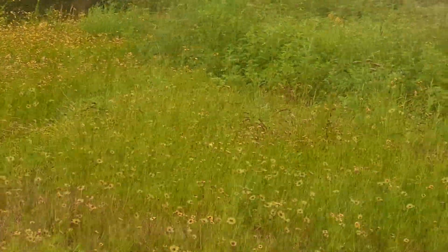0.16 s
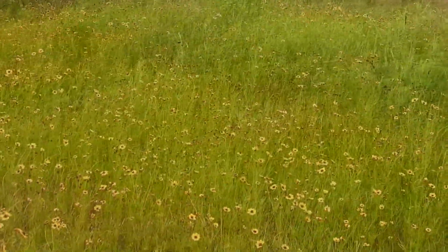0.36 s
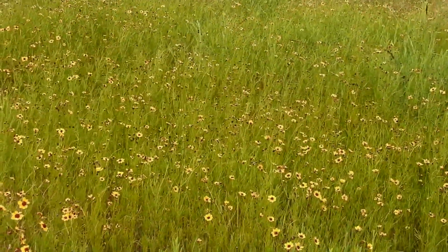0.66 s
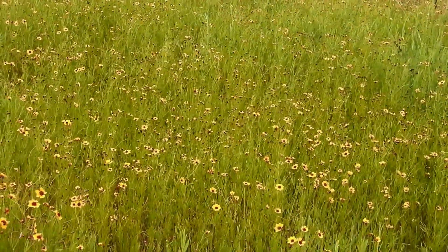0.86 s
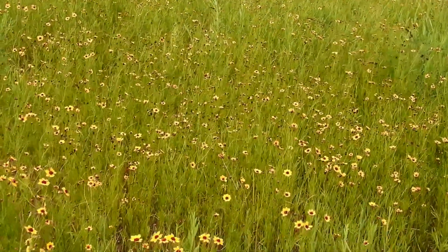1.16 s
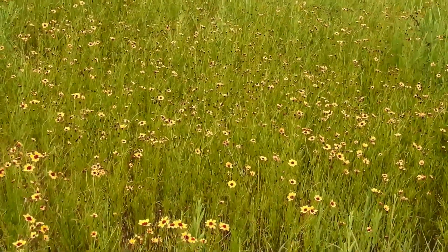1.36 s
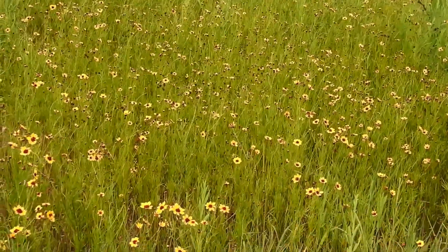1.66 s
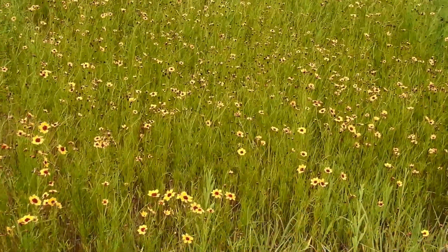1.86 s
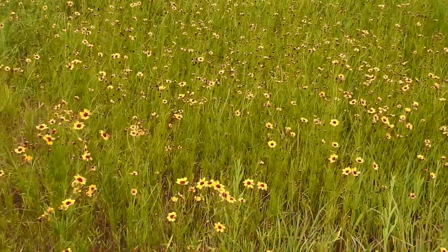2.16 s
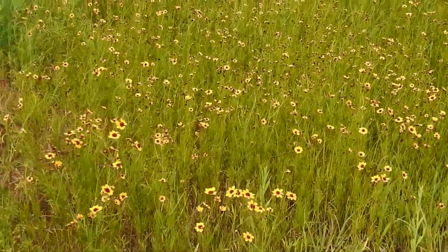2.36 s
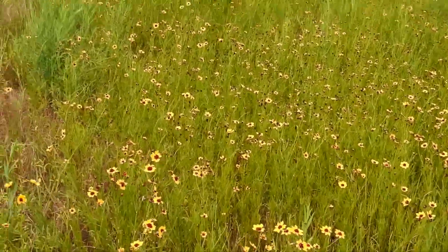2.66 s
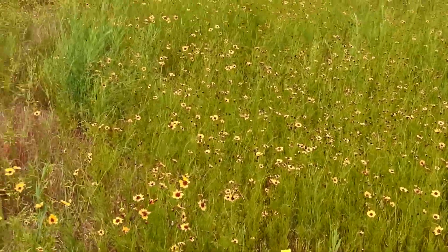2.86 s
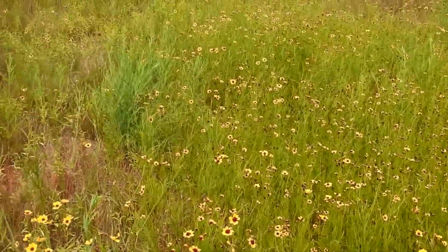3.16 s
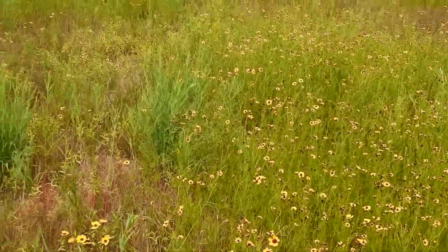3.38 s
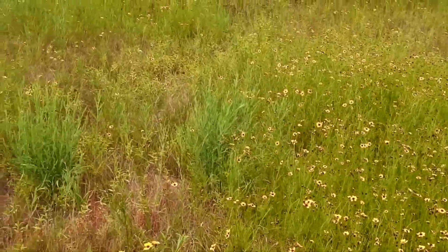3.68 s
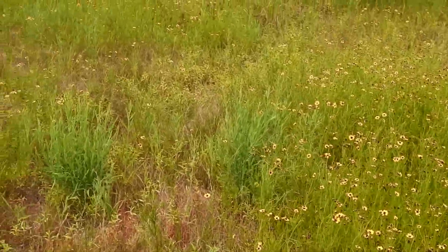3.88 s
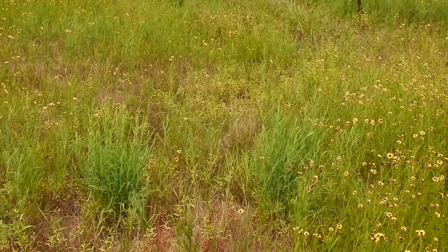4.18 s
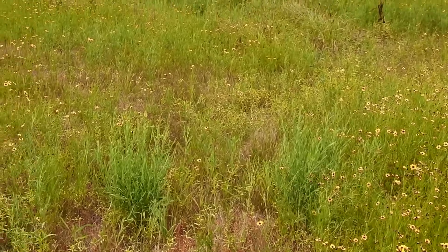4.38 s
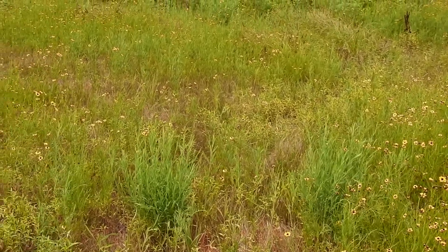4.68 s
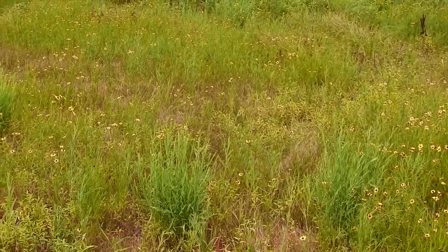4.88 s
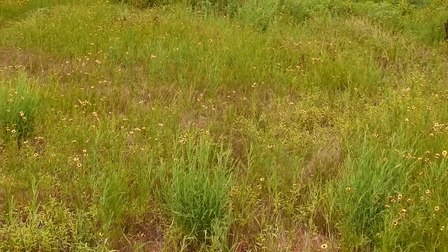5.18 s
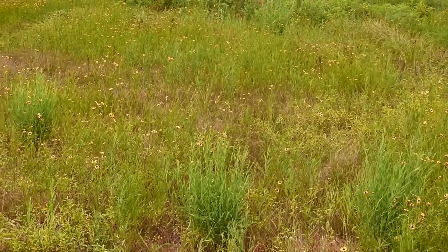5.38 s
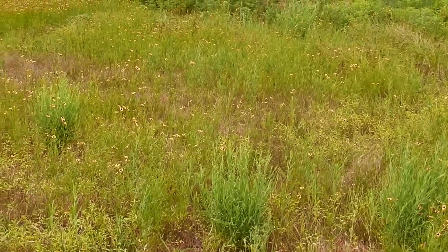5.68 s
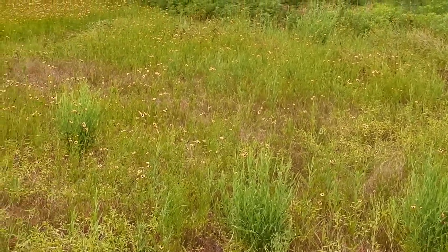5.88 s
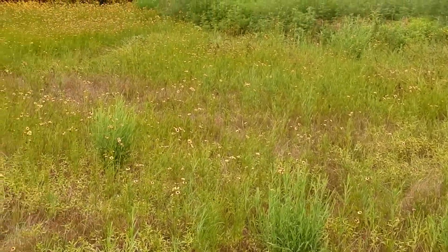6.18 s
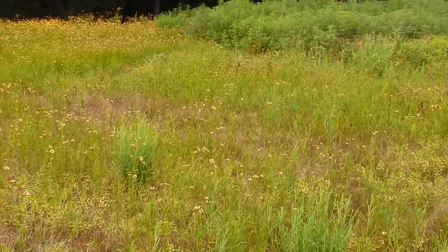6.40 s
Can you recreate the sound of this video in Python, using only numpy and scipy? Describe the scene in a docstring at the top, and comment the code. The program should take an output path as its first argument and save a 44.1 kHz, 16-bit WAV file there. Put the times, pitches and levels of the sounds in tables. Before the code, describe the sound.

A rough gust thumps and fades to steady high insect drone and busy birdsong, with faint bee hums and renewed wind rumble at the end.

```python
"""A gust buffets a hand-held pair of microphone ports, over a far wash of grass and air; gusts return at the end.
A cricket chorus drones under one near triller and the rasps of two katydids; wing hums rise and fade later.
Birds sing clear whistles, burry slurs and quick chips. Wind, wash and wings are shaped noise, with a
gliding tone in the near trill; birdsong and wing hums are near-sine tones."""
import sys
import numpy as np
from scipy import signal
from scipy.fft import rfft, irfft
from scipy.io import wavfile
from scipy.ndimage import uniform_filter1d

SR = 44100
rng = np.random.default_rng(int(sys.argv[2]) if len(sys.argv) > 2 else 0)


def to_wav(sig):
    """Store sig (one row per channel, or 1-D mono) as 16-bit WAV at the path in sys.argv[1].

    Samples outside -1..1 are clipped; the rate is SR.
    """
    pcm = np.clip(np.atleast_2d(sig), -1, 1) * 32767
    pcm = np.round(pcm).astype(np.int16)
    wavfile.write(sys.argv[1], SR, pcm.T)  # frames by channels


N = 288502

# one table a gust: (time [s], force at left port [dB], force at right port [dB])
GUSTS = [
    [(0.0, -5.5, -8.5), (0.017, -13.5, -15), (0.03, -10, -15), (0.08, -10, -11), (0.097, -16.5, -11.5),
     (0.122, -12.5, -14.5), (0.162, -12, -13), (0.172, -20.5, -15), (0.19, -12, -12), (0.215, -22, -27),
     (0.224, -23, -23), (0.252, -13, -16), (0.267, -23, -19), (0.282, -19, -17.5), (0.304, -15.5, -19),
     (0.357, -20, -20.5), (0.367, -21.5, -20), (0.496, -24.5, -27.5), (0.516, -42, -39.5),
     (0.551, -36, -38), (0.566, -56, -61), (0.591, -42.5, -40.5), (0.639, -57, -59), (0.718, -53, -55)],
    [(5.2, -49.5, -52), (5.302, -47.5, -59), (5.322, -38.5, -34.5), (5.34, -37.5, -48), (5.39, -47, -49),
     (5.407, -39, -41.5), (5.452, -51, -48.0), (5.482, -33.5, -47), (5.532, -47, -50), (5.589, -28.5, -35),
     (5.632, -52, -48.5), (5.664, -40, -42), (5.696, -37, -38), (5.714, -46, -44), (5.786, -40.5, -34),
     (5.839, -41, -43), (5.898, -22, -24), (5.951, -24.5, -27), (5.971, -37, -31), (5.986, -24.5, -22.5),
     (6.003, -31.5, -30.0), (6.046, -15, -14), (6.063, -23, -26.0), (6.078, -15, -18.5),
     (6.143, -19.5, -17), (6.155, -19, -22), (6.165, -20, -21), (6.198, -25, -22), (6.215, -26, -22),
     (6.23, -21, -23.5), (6.245, -23, -29), (6.263, -21, -17.5), (6.29, -30, -30.5), (6.322, -20, -17.5),
     (6.382, -26, -26), (6.41, -23, -21), (6.432, -30, -29.5), (6.452, -15.5, -17), (6.48, -26, -28),
     (6.495, -20, -19), (6.522, -21.0, -15), (6.539, -14.5, -14)],
]
# tone of each gust: (harshness at a force of 0 dB [dB], strength of the recorder's block ticks during it [dB])
GUST_TONES = [(-12.5, 13), (-22.5, 8)]
# body of the buffet, its last level held above: (frequency [Hz], relative level [dB])
BUFFET = [(25, -45), (70, -16), (105, -9), (135, -0.5), (200, 2.5), (250, -2.5)]
# sharp eddies that slap one port: (time [s], pitch [Hz], level [dB], port [0 left, 1 right])
EDDIES = [(0.022, 1030, -15, 0), (0.039, 660, -36, 1), (0.06, 920, -16, 0), (0.06, 850, -15, 1),
          (0.075, 780, -17.5, 1), (0.085, 1190, -25.5, 0), (0.104, 435, -10, 1), (0.103, 510, -24, 0),
          (0.126, 397, -29, 0), (0.129, 425, -18, 1), (0.158, 740, -22, 1), (0.173, 1270, -25, 0),
          (0.25, 463, -24, 0), (0.251, 422, -14, 1), (0.269, 845, -18, 1), (0.133, 1050, -35, 1),
          (0.311, 710, -27, 0), (0.212, 1190, -31, 0), (0.303, 1280, -20.5, 0), (0.332, 437, -18, 1),
          (0.337, 1300, -27, 0), (0.402, 760, -28.5, 0), (5.898, 560, -29, 1), (6.012, 435, -25, 0),
          (6.04, 450, -21, 1), (6.108, 576, -24, 1), (6.164, 536, -24, 0), (0.063, 500, -19, 0),
          (0.084, 450, -16, 0), (0.225, 234, -12, 1), (5.88, 610, -36, 0), (6.045, 202, -15, 1),
          (6.049, 207, -10, 0), (6.144, 199, -14, 0), (6.229, 194, -13, 0), (6.23, 198, -15, 1),
          (6.409, 200, -16, 0), (6.408, 210, -18.5, 1), (6.455, 203, -12, 1), (6.492, 191, -16.5, 1),
          (6.497, 177, -12, 0), (6.163, 1050, -39, 0), (6.02, 754, -32.5, 1), (6.27, 710, -31.5, 1),
          (6.187, 664, -31, 0), (6.323, 460, -21, 1), (6.323, 397, -22.5, 0), (6.453, 382, -19, 0),
          (6.507, 580, -20, 1), (6.528, 925, -21, 1)]
# colour of the far wash: (frequency [Hz], relative level [dB])
WASH = [(20, -52), (60, 6), (140, -5.5), (320, -8.5), (800, -15.5), (1900, -18.5), (2800, -13.5),
        (5000, -11.5), (6900, -9.5), (7600, -22), (8300, -25), (10200, -22), (10800, -87), (12500, -40),
        (15500, -42.5)]
# swell of the wash's low and middle range: (time [s], level [dB])
SWELL = [(0.6, -1), (0.9, -3.5), (1.5, -1.5), (1.66, 1), (1.93, 1), (2.12, -2.5), (3.4, -1.5), (4.0, -0.5),
         (4.37, 2.5), (4.7, 0), (5.13, 3), (5.3, 0)]
# swell of the deepest bass: (time [s], level [dB])
RUMBLE = [(0.69, -10), (0.83, -3), (0.95, -4), (1.5, 4.5), (1.71, -20), (2.05, -17), (2.12, -1.5), (3.0, 2),
          (4.0, -3), (4.37, 6), (4.74, 2), (5.06, -16), (5.13, -1)]
# how the wash reaches the ports: (frequency [Hz], likeness [0-1], left port's lead [rad], left minus right [dB])
WASH_PORTS = [(59.7, 0.86, 0.5, 0.5), (700, 0.96, -0.46, 0), (1820, 0.92, -0.7, 2), (3040, 0.74, 1, 3.5),
              (3320, 0.99, .5, 4.5), (4830, 0.5, 1.34, -1), (5230, 1, 1.5, 7), (6900, 0.6, -9.5, 3),
              (7390, 0.76, 3.5, 2), (11000, 1, 4, -1), (13000, .05, -36.5, 0)]
# cricket levels: (time [s], near triller [dB], far chorus [dB])
CRICKETS = [(0.0, -63, -39), (0.3, -39, -39), (0.65, -39, -35), (2.0, -39.5, -35.5), (2.5, -36.5, -36),
            (3.3, -35, -37), (4.0, -39, -39), (4.5, -39, -38.5), (5.2, -40, -39.5), (5.9, -50, -38.5),
            (6.54, -44.5, -40)]
# wing resonances of the far chorus: (frequency [Hz], width [Hz], relative level [dB])
WINGS = [(6065, 386, 8), (6280, 138, 4), (6460, 200, -12)]
# middle of each katydid rasp: (time [s])
KATYDID = [0.16, 0.35, 0.53, 0.74, 0.92, 1.11, 1.31, 1.51, 1.73, 1.93, 2.12, 2.28, 2.48, 2.64, 3.04, 3.27,
           3.48, 3.66, 3.87, 4.06, 4.31, 4.49, 4.69, 4.87, 5.05, 5.2, 5.37, 5.56, 5.77, 5.98, 6.19, 6.37,
           6.53]
# first katydid: (time [s], level [dB], left port's lead [rad])
KATYDID_LEVEL = [(0.16, -55, -2), (.4, -52, -2), (.9, -49, -2.5), (2.1, -52, -2), (3.0, -53, -3),
                 (3.8, -54, -3), (4.5, -53.5, -3.5), (5.1, -52, -2.5), (5.6, -51, -2.5), (6.0, -49.5, -4),
                 (6.54, -48, -3.5)]
# middle of each rasp of a second, higher katydid: (time [s])
NEIGHBOUR = [.44, .68, .96, 1.15, 1.36, 1.55, 1.71, 1.87, 2.08, 2.26, 2.45, 2.66, 2.862, 3.08, 3.295, 3.52,
             3.75, 3.985, 4.194, 4.402, 4.66, 4.9, 5.1, 5.33, 5.535, 5.73, 5.96, 6.33]
# second katydid: (time [s], level [dB], left port's lead [rad])
NEIGHBOUR_LEVEL = [(.4, -61, -9), (2.5, -56.5, -2), (3.0, -57.5, -9), (4.4, -54.5, -3.5), (5.5, -62, -3),
                   (6.4, -58, -2.5)]
# plain notes of the whistler: (start [s], length [s], from pitch [Hz], to pitch [Hz], level [dB])
WHISTLES = [(3.405, 0.039, 5600, 5700, -35), (3.61, 0.09, 4060, 4080, -43), (4.775, 0.035, 5960, 5720, -29),
            (4.866, 0.029, 4760, 3580, -37.5), (4.99, 0.025, 4590, 4550, -36),
            (5.012, 0.023, 4580, 4170, -37.5), (4.825, 0.027, 6150, 7100, -42),
            (5.71, .03, 5300, 4350, -41.5), (5.74, .018, 4400, 4370, -43), (5.855, .015, 5700, 5150, -41),
            (5.935, .03, 4200, 4130, -45), (5.965, 0.037, 5630, 4230, -39.5),
            (6.055, .015, 3210, 3900, -42), (6.128, 0.021, 4770, 5130, -39), (6.135, 0.13, 7900, 8300, -51),
            (6.218, 0.023, 5660, 4130, -41.5), (6.245, 0.045, 4100, 2870, -48),
            (5.71, 0.039, 5770, 5720, -34), (6.392, 0.021, 7700, 7620, -51)]
# burry notes of the farther singer: (start [s], length [s], from pitch [Hz], to pitch [Hz], level [dB])
SLURS = [(.5, 0.08, 3620, 3300, -51), (.85, 0.068, 3800, 3120, -48.5), (2.52, 0.054, 3780, 2600, -51),
         (2.68, 0.094, 2510, 2380, -52), (2.83, 0.066, 3700, 3110, -46), (3.08, 0.035, 3880, 3850, -42),
         (3.268, 0.079, 4110, 3450, -43.5), (3.45, 0.061, 3840, 3630, -45), (3.515, 0.044, 3580, 3200, -51),
         (3.775, 0.093, 3960, 3620, -45.5), (3.885, 0.063, 3600, 3050, -42), (4.1, 0.14, 3450, 3040, -46.5),
         (4.165, 0.034, 4200, 4230, -48), (4.185, 0.066, 2645, 2500, -49.5), (4.7, 0.08, 3870, 3500, -41.5),
         (4.755, 0.056, 2470, 2470, -51.5), (4.91, 0.035, 3450, 3320, -53), (4.97, 0.036, 2990, 2610, -58),
         (5.722, 0.081, 3600, 3740, -44.5), (5.785, 0.115, 3780, 2800, -43)]
# quick notes of the farther singer: (start [s], length [s], from pitch [Hz], to pitch [Hz], level [dB])
CHIPS = [(.353, 0.01, 2640, 2480, -45), (.373, 0.02, 2520, 2740, -52), (.418, 0.019, 2410, 2140, -59),
         (.438, 0.0092, 3320, 2880, -44), (.468, 0.0096, 2970, 2610, -45), (.953, 0.018, 3250, 2570, -46),
         (.99, 0.02, 3020, 2750, -54), (1.49, .018, 3570, 2950, -58), (1.636, .02, 4080, 3080, -47),
         (1.795, 0.013, 3720, 3300, -49), (1.816, 0.035, 3250, 2400, -48), (1.865, .035, 2620, 2150, -50),
         (1.924, 0.015, 3720, 3200, -49), (2.705, 0.017, 3860, 3150, -48), (2.953, 0.019, 3400, 2900, -47),
         (2.986, 0.026, 3800, 3050, -43.5), (3.021, .021, 3400, 2750, -47.5),
         (3.125, 0.018, 3770, 3470, -52), (3.14, 0.027, 3460, 2650, -45.5), (3.167, 0.02, 2630, 2320, -52),
         (3.345, 0.027, 3300, 2320, -52), (3.385, 0.019, 2930, 2300, -44.5),
         (3.403, 0.018, 2470, 2650, -52), (3.578, 0.013, 2900, 2350, -48), (3.6, .025, 2820, 2200, -47),
         (3.685, .018, 2990, 2320, -52), (3.705, .02, 1920, 1650, -60), (3.72, 0.017, 2600, 2400, -57),
         (4.3, 0.014, 2750, 2670, -46.5), (4.385, 0.02, 2830, 2360, -44.5), (4.7, 0.014, 3330, 3130, -47),
         (4.745, 0.018, 3220, 2910, -46), (4.84, 0.014, 2350, 2660, -45.5), (4.893, 0.013, 2470, 2400, -50),
         (5.095, 0.012, 2160, 2080, -53), (5.215, 0.015, 1820, 2100, -59), (5.245, 0.014, 2140, 1850, -53),
         (5.245, 0.026, 3900, 2330, -47), (5.277, 0.011, 2520, 1800, -60), (5.29, 0.023, 2810, 1840, -49),
         (5.313, 0.02, 3110, 2150, -49), (5.592, 0.022, 3300, 2130, -49), (5.617, 0.017, 3300, 2550, -48),
         (5.637, 0.016, 2520, 2480, -45), (5.652, 0.02, 2230, 1710, -50), (5.66, 0.024, 4350, 3250, -48),
         (5.675, 0.017, 2700, 2370, -49), (5.702, 0.019, 3670, 2780, -48), (5.79, .02, 1800, 2130, -51),
         (5.93, 0.023, 2470, 2670, -46), (5.938, 0.03, 4400, 3010, -45), (5.97, 0.028, 2670, 2260, -47.5),
         (6.0, .015, 2150, 1830, -50.5), (6.155, 0.025, 4070, 4270, -49), (6.31, 0.049, 3200, 1820, -55),
         (6.34, 0.012, 3460, 3000, -45)]
# the whistler's arching call: (time after start [s], pitch [Hz], level against the call's [dB])
ARCH = [(0, 4426, -5), (.007, 4804, 1.5), (.035, 5170, 1), (.057, 6080, 4), (.077, 6240, -2.5),
        (.094, 5720, -2.5), (.11, 4450, 3.5), (.122, 4020, -3), (.13, 3850, -8), (.157, 3420, -5),
        (.179, 3220, -9.5)]
# the whistler's spiking call: (time after start [s], pitch [Hz], level against the call's [dB])
SPIKE = [(0, 3420, -8.5), (.028, 4030, -4.5), (.034, 5630, 5), (.038, 6850, -15), (.044, 5980, -6),
         (.056, 4650, 2.5), (.068, 3540, -17)]
# the whistler's hooking call: (time after start [s], pitch [Hz], level against the call's [dB])
HOOK = [(0, 4140, -1), (.023, 3660, -14), (.04, 4230, 1), (.06, 4720, 3.5), (.07, 4530, -6)]
# the whistler's capped call: (time after start [s], pitch [Hz], level against the call's [dB])
CAP = [(0, 6700, -14), (.012, 7300, 1), (.025, 7310, 0), (.05, 6960, -10)]
# when each arch is sung: (start [s], level [dB])
ARCHES = [(3.844, -32.5), (4.143, -30), (6.427, -35)]
# when each spike is sung: (start [s], level [dB])
SPIKES = [(4.423, -36.5), (4.597, -30)]
# when each hook is sung: (start [s], level [dB])
HOOKS = [(5.316, -40), (5.498, -40)]
# when each cap is sung: (start [s], level [dB])
CAPS = [(3.787, -42), (4.089, -35)]
# the whistler is off to the right, and the ports turn: (time [s], delay at the left port [microseconds])
WHISTLER_LAG = [(3.4, 70), (4.1, 49), (5.5, 64), (5.98, 56), (6.1, 47), (6.5, 36)]
# one table a bee: (time [s], wing beat [Hz], level [dB], overtone against it [dB])
BEES = [
    [(4.15, 272.5, -59, -8), (4.35, 272, -51.5, 1), (4.6, 267.7, -52.5, -3), (4.85, 273.5, -61.5, -5)],
    [(4.2, 339.6, -72, -3), (4.4, 343, -56.5, 1.5), (4.65, 324.4, -52, -12), (5.0, 331, -52.5, -15),
     (5.4, 323, -63, -20)],
]

HARSHER = 0.23  # dB of harshness per dB of force
STEADIED = .35  # share of the buffet's own flutter that is evened out
SEAM_SPACING_S, FIRST_SEAM_S = .01066, .0038  # steady ticks at the recorder's block seams, timed from zero
WASH_DB, RUMBLE_FLICKER_DB = -51, 1.5
STROKES_PER_S, FIRST_STROKE_S = 56.31, .0015  # wing strokes of the near cricket
RASP_S = 0.074  # length of a katydid rasp
SLUR_BURR = .85  # depth of the burr, 0-1
SWELLING_DB = 5  # a plain note is this much softer at its ends
# share of the glide beyond half still owed at mid-note: positive moves late, negative early
WHISTLE_BOW, SLUR_BOW, CHIP_BOW = 0.0965, 0.119, -.1
EDGE_HZ = 15650  # upper band limit


def gain_of(db):
    """Amplitude factor for a level in dB."""
    return 10 ** (np.asarray(db) / 20)


def evened(x):
    """Scales a signal to an RMS of one."""
    return x / np.sqrt(np.mean(abs(x) ** 2) + 1e-20)


def read(points, hz):
    """Columns of a table on a log-frequency axis."""
    f, *columns = np.transpose(points)
    return [np.interp(np.log(hz + 1), np.log(f + 1), c)[:, None] for c in columns]


def follow(rows, t):
    """Columns of a curve at the times t."""
    s, *columns = np.transpose(rows)
    return [np.interp(t, s, c) for c in columns]


def add(mix, s, sound):
    """Lays a sound into the mix from s seconds, cut at the end."""
    part = mix[..., max(round(s * SR), 0):][..., :sound.shape[-1]]
    part += sound[..., :part.shape[-1]]


def resonate(x, hz, width):
    """A steep resonance: shift hz to zero, smooth twice, shift back."""
    turn = np.exp(2j * np.pi * hz * np.arange(x.shape[-1]) / SR)
    r = np.exp(-np.pi * width / SR)
    once = signal.lfilter([1 - r], [1, -r], x / turn)
    twice = signal.lfilter([1 - r], [1, -r], once)
    return twice * turn


def ports(z, lead, pan_db):
    """Places an analytic signal between the ports by the left port's phase lead and level excess."""
    side = np.array([[.5], [-.5]])
    return (z * np.exp(1j * lead * side) * gain_of(pan_db * side)).real


def scatter(x, t60, wet_db):
    """Grass and bushes throw back a short diffuse tail, decaying 60 dB in t60 seconds, other for each port."""
    t = np.arange(round(.3 * SR)) / SR
    tail = rng.standard_normal((2, len(t))) * gain_of(-60 * t / t60) * (t > .004)
    tail = tail / np.linalg.norm(tail[0])
    return x + gain_of(wet_db) * signal.fftconvolve(x, tail, axes=1)[:, :N]


def buffet(force_db, harsh_db, length):
    """Turbulence at each port: deep noise whose upper part spits up and down from moment to moment."""
    hz, frames = np.fft.rfftfreq(512, 1 / SR), force_db.shape[1]
    harsh_db = harsh_db + HARSHER * force_db[:, None]
    spits = evened(uniform_filter1d(rng.standard_normal((frames, 2)), size=3, axis=0)).T[:, None]
    reach = np.log(np.maximum(hz, 250) / 250)[:, None] / np.log(4)  # 0 up to 250 Hz, 1 at 1 kHz
    upper_db = reach * (harsh_db + 4.5 * spits) - 8.1 * reach ** 2
    a, b = rng.standard_normal((frames, 257, 2, 2)).T
    x = signal.istft((a + 1j * b) * gain_of(upper_db), nperseg=512, noverlap=448)[1][:, :length]
    body = gain_of(read(BUFFET, np.arange(SR + 1) / 2)[0].T)
    x = evened(irfft(rfft(x, SR * 2) * body)[:, :length])
    power = uniform_filter1d(uniform_filter1d(x ** 2, size=400, axis=1), size=400, axis=1)
    flutter = abs(power) + .01
    return evened(x / flutter ** (STEADIED / 2))


def wind():
    """Each gust shakes both ports independently; the recorder, working in blocks, ticks at each seam with its force."""
    out = np.zeros((2, N))
    for rows, (harsh_db, tick_db) in zip(GUSTS, GUST_TONES):
        t = np.arange(rows[0][0], rows[-1][0], 1 / SR)
        frame_t = t[0] + np.arange(len(t) // 64 + 9) * 64 / SR
        x = buffet(np.array(follow(rows, frame_t)), harsh_db, len(t))
        seams = np.diff(np.floor((t - FIRST_SEAM_S) / SEAM_SPACING_S), prepend=np.inf) > 0
        ticks = rng.standard_normal((len(t), 2)).T * seams
        x = x + gain_of(tick_db) * uniform_filter1d(ticks, size=10, axis=1)
        add(out, t[0], gain_of(follow(rows, t)) * x)
    return out


def eddies():
    """Each slap is resonant noise under a bell-shaped fade, a rough burst of about ten milliseconds."""
    out, t = np.zeros((2, N)), np.arange(-.02, .02, 1 / SR)
    for s, hz, db, port in EDDIES:
        burst = evened(resonate(rng.standard_normal(len(t)), hz, 0.26 * hz).real)
        add(out[int(port > .5)], s - .02, gain_of(db) * burst * np.exp(-(t / 0.0049) ** 2))
    return out


def wash():
    """Far grass, air and insects: random short-time spectra with drifting patches."""
    frames, hz = N // 256 + 5, np.fft.rfftfreq(1024, 1 / SR)
    a, b, c, d, patches = rng.standard_normal((frames, 513, 5)).T
    patches = evened(uniform_filter1d(uniform_filter1d(patches, size=10, axis=0), size=12, axis=1))
    t = np.arange(frames) * 256 / SR
    flicker = evened(uniform_filter1d(rng.standard_normal(frames), size=14))
    swell_db = follow(SWELL, t)[0]
    rumble_db = follow(RUMBLE, t)[0] + RUMBLE_FLICKER_DB * flicker
    same, lead, pan_db = read(WASH_PORTS, hz)
    same = np.clip(same, 0, 1)
    left = a + 1j * b
    right = same * np.exp(-1j * lead) * left + np.sqrt(1 - same ** 2) * (c + 1j * d)
    low = np.exp(-(hz / 130) ** 2)[:, None]
    mid = np.exp(-(hz / 2300) ** 4)[:, None]
    # the swell moves the low and middle range; the insect hiss above does not follow it
    field_db = read(WASH, hz)[0] + mid * swell_db + low * rumble_db + 1.88 * patches
    both = np.array([left * gain_of(pan_db / 2), right / gain_of(pan_db / 2)])
    return signal.istft(both * gain_of(field_db + WASH_DB), nperseg=1024, noverlap=768)[1][:, :N]


def far_crickets():
    """A blurred chorus: noise, partly shared by the ports, rings in a few wing resonances."""
    chorus = np.zeros((2, N))
    for hz, width, db in WINGS:
        shared, *own = rng.standard_normal((3, N))
        together = ports(evened(resonate(shared, hz, width)), -2.38, .8)
        apart = evened(resonate(np.array(own), hz, width)).real
        chorus += gain_of(db) * (0.65 * together + 0.75 * apart)
    return evened(chorus)


def near_cricket(t):
    """One near cricket scrapes in steady strokes, a sagging tone roughened by resonant noise."""
    unsteady = evened(uniform_filter1d(rng.standard_normal(N), size=900))
    stroke = (STROKES_PER_S * (t - FIRST_STROKE_S) + 0.0056 * unsteady + .5) % 1 - .5
    closing = np.exp(-(stroke / 0.26) ** 2)  # the wing sounds mainly while it closes
    hz = 6290 + 40 * unsteady - 1300 * stroke * closing  # pitch falls through each stroke, from above 6290 Hz to below it
    glide = np.exp(2j * np.pi * np.cumsum(hz) / SR)
    rasp = evened(resonate(rng.standard_normal(N), 6150, 700))
    return scatter(ports(evened(closing * (glide + .35 * rasp)), -.6, .5), .06, -9)


def crickets():
    """The far chorus and the near triller, each following its own level curve."""
    t = np.arange(N) / SR
    near_db, far_db = follow(CRICKETS, t)
    return gain_of(far_db) * far_crickets() + gain_of(near_db) * near_cricket(t)


def katydid():
    """Each rasp is a flat burst of fast tooth strikes ringing a high wing; a higher neighbour keeps its own time."""
    t, out = np.arange(N) / SR, np.zeros((2, N))
    strikes = rng.choice([-30, 30], (2, N)) * (np.diff(np.floor(132 * t), prepend=0) > 0)  # 132 a second
    teeth = strikes + .8 * rng.standard_normal((2, N))  # strikes and scrape
    singers = ((teeth[0], KATYDID, KATYDID_LEVEL, 8830), (teeth[1], NEIGHBOUR, NEIGHBOUR_LEVEL, 9250))
    for drive, times, level, hz in singers:
        bursts = np.zeros(N)
        for s in times:
            add(bursts, s - RASP_S / 2, signal.windows.tukey(round(RASP_S * SR), .4))
        db, lead = follow(level, t)
        out += ports(gain_of(db) * bursts * evened(resonate(drive, hz, 600)), lead, -1.2)
    return scatter(out, 0.042, -5.0)


def calls(shape, rows):
    """One fixed shape of pitch and level, sung at each start."""
    return [np.add(shape, (s, 0, db)) for s, db in rows]


def glides(rows, bow):
    """A plain note slides from one pitch to the other along a bowed line, loudest in its middle."""
    notes = []
    for s, length, a, b, db in rows:
        middle = (s + length / 2, (a + b) / 2 + bow * (a - b), db)
        notes.append([(s, a, db - SWELLING_DB), middle, (s + length, b, db - SWELLING_DB)])
    return notes


def song(notes, burr, edge_s, lag=((0, 0),)):
    """Near-sine notes, one row a port; a burr pulses the tone and swings its pitch about 140 times a second."""
    out = np.zeros((2, N), complex)
    for rows in notes:
        t = np.arange(rows[0][0] - edge_s, rows[-1][0] + edge_s, 1 / SR)
        hz, db = follow(rows, t)
        unsteady = evened(uniform_filter1d(rng.standard_normal(len(t)), size=150))
        beat = 2 * np.pi * (140 * t + rng.random()) + 0.23 * unsteady
        hz = uniform_filter1d(hz, size=130) * (1 + burr * (.033 * np.sin(beat) + .012 * unsteady))
        fade = signal.windows.tukey(len(t), min(4 * edge_s / (t[-1] - t[0]), 1))
        delay_turns = hz * follow(lag, t)[0] * np.array([[-.5e-6], [.5e-6]])  # split between the ports
        tone = np.exp(2j * np.pi * (np.cumsum(hz) / SR + delay_turns))
        add(out, t[0], np.sqrt(2) * gain_of(db) * fade * tone * (1 + burr * np.cos(beat)))
    return out


def birds():
    """Gliding tones: the whistler sits to the right, the other singer farther off to the left."""
    clear = calls(ARCH, ARCHES) + calls(SPIKE, SPIKES) + calls(HOOK, HOOKS) + calls(CAP, CAPS)
    clear += glides(WHISTLES, WHISTLE_BOW)
    whistler = ports(song(clear, burr=0.082, edge_s=.003, lag=WHISTLER_LAG), 0, 0.74)
    slurs = ports(song(glides(SLURS, SLUR_BOW), burr=SLUR_BURR, edge_s=0.0074), 0.66, 6.6)
    chips = ports(song(glides(CHIPS, CHIP_BOW), burr=.03, edge_s=0.0027), 0.22, 9.9)
    return scatter(whistler, 0.16, -12.0) + scatter(slurs + chips, .19, -8)


def bees():
    """A faint wing hum with one overtone, wavering in pitch and strength, alike at both ports."""
    out = np.zeros(N)
    for rows in BEES:
        t = np.arange(rows[0][0], rows[-1][0], 1 / SR)
        hz, db, over_db = follow(rows, t)
        waver, throb = evened(uniform_filter1d(rng.standard_normal((len(t), 2)), size=3000, axis=0)).T
        phase = 2 * np.pi * np.cumsum(hz * (1 + .008 * waver)) / SR
        hum = np.sin(phase) + gain_of(over_db) * np.sin(2 * phase)
        add(out, t[0], gain_of(db + 3 * throb) * hum)
    return out


def scene():
    """Sums the meadow, with the treble of the wind softened."""
    dull = signal.butter(2, 2200, fs=SR, output="sos")  # the ports dull the gusts and slaps
    air = signal.sosfilt(dull, wind() + eddies())
    return air + wash() + crickets() + katydid() + birds() + bees()


def record(dry):
    """Gain control ducks the meadow under the strongest gusts; then peaks round off and the band is limited."""
    power = abs(uniform_filter1d((dry ** 2).mean(0), size=4000, mode="nearest"))
    power_db = 10 * np.log10(power + 1e-12)
    fall = np.arange(N) * 25. / SR  # the held peak level falls 25 dB a second
    held_db = np.maximum.accumulate(power_db + fall) - fall
    over_db = np.maximum(held_db + 21, 0)  # excess above -21 dB
    ducked = dry / gain_of(0.23 * over_db)
    rounded = 0.77 * np.tanh(ducked / 0.83)  # the loudest slaps round off
    band = signal.firwin(511, EDGE_HZ, window=("kaiser", 9), fs=SR)
    return signal.oaconvolve(rounded, band[None], "same")


dry = scene()
out = record(dry)
to_wav(out)
```